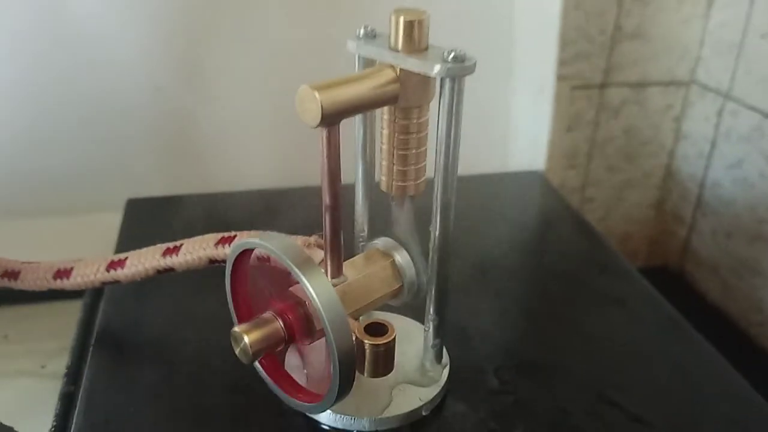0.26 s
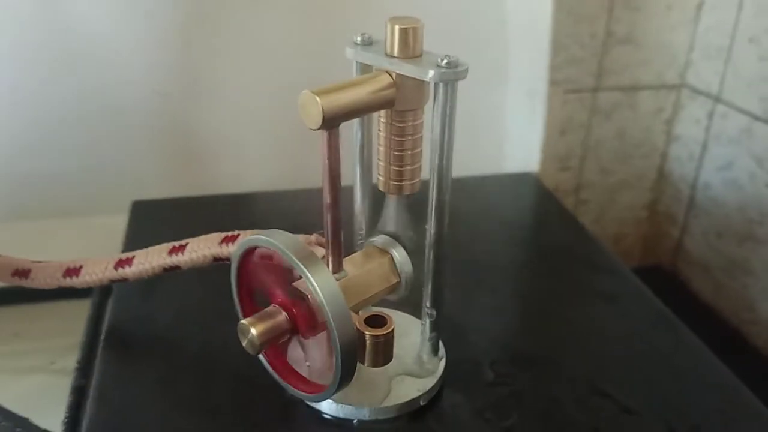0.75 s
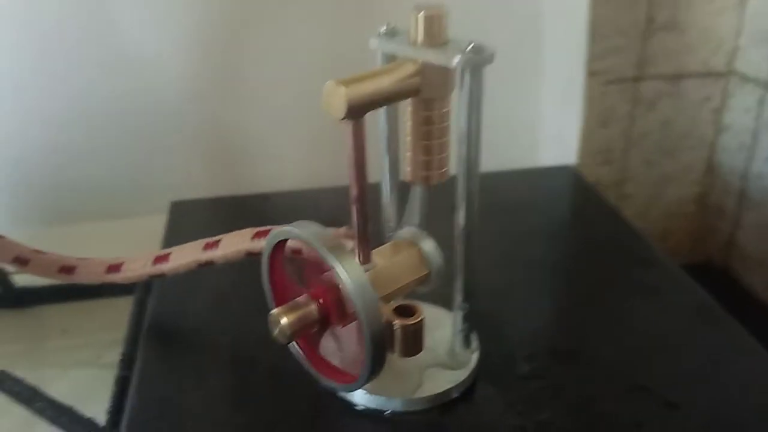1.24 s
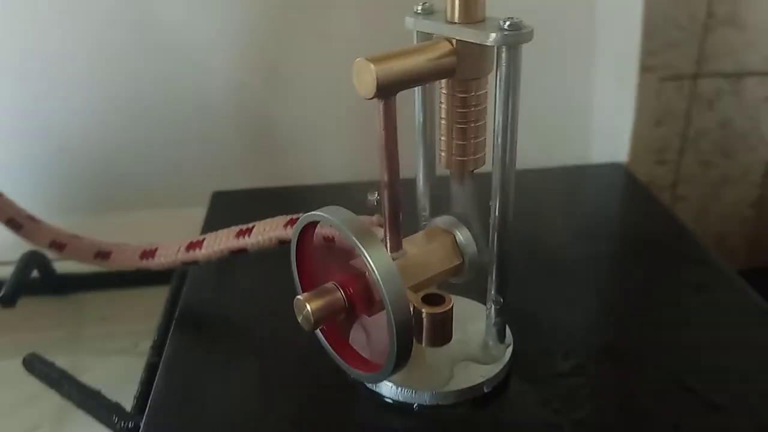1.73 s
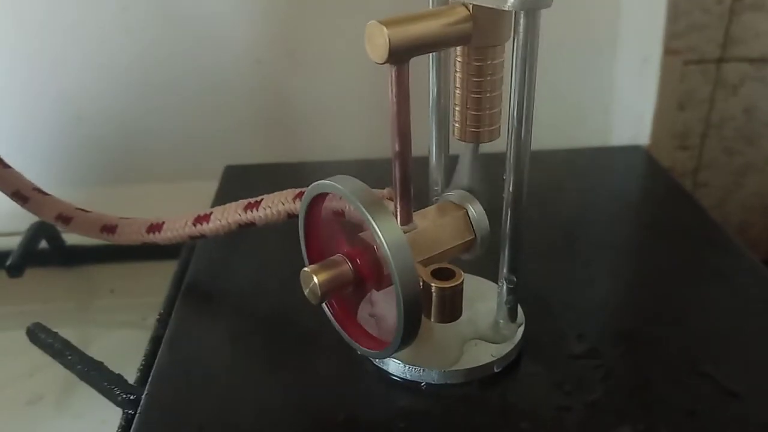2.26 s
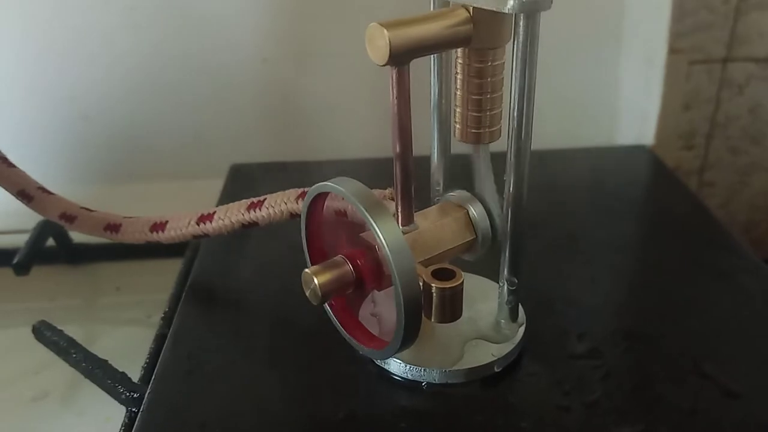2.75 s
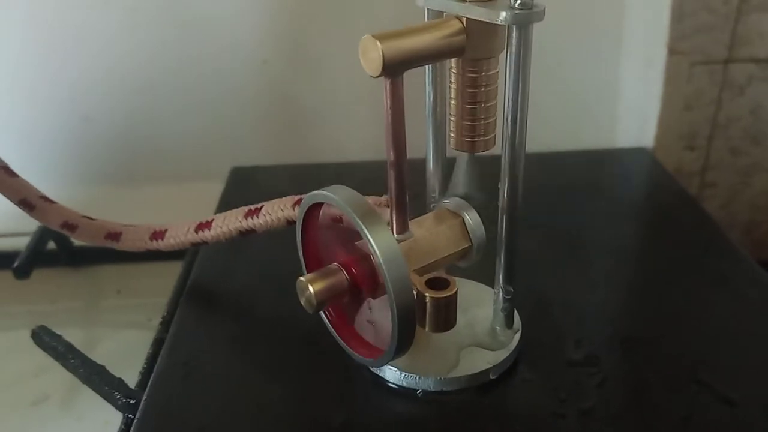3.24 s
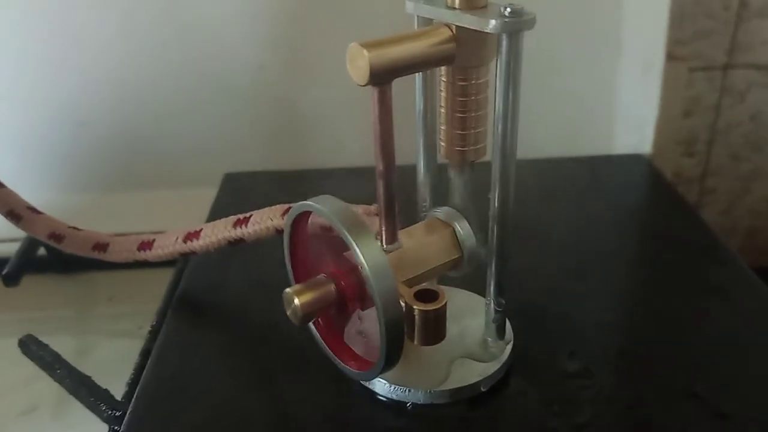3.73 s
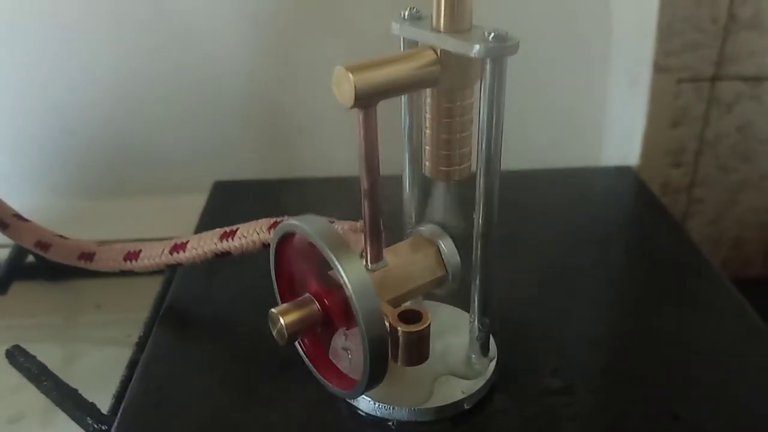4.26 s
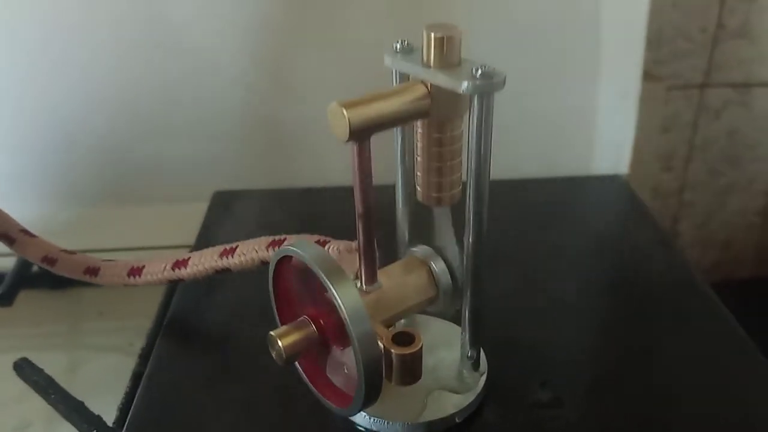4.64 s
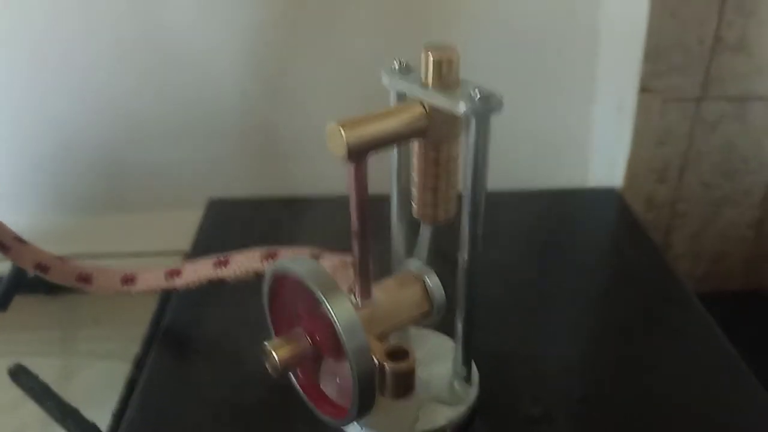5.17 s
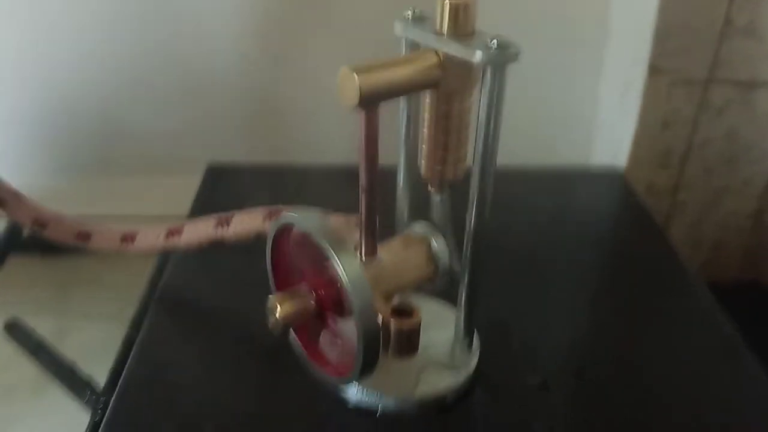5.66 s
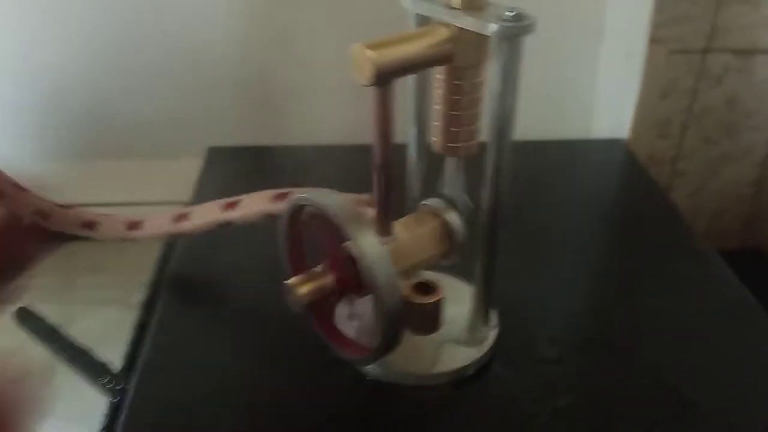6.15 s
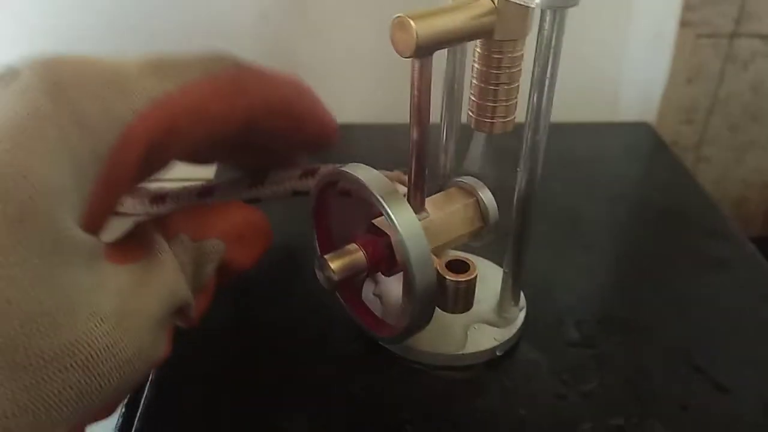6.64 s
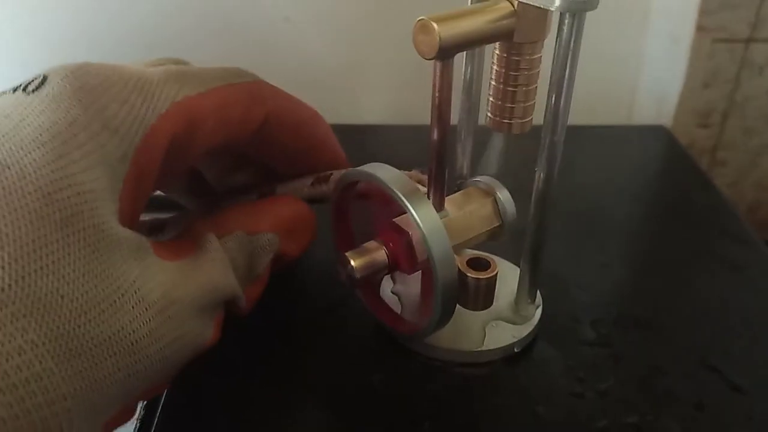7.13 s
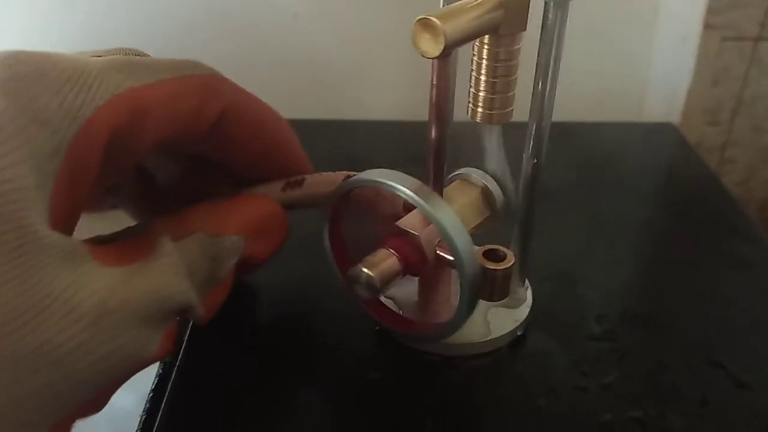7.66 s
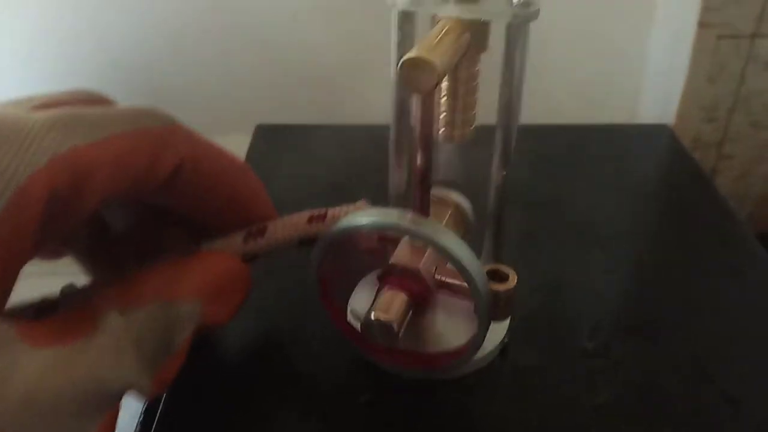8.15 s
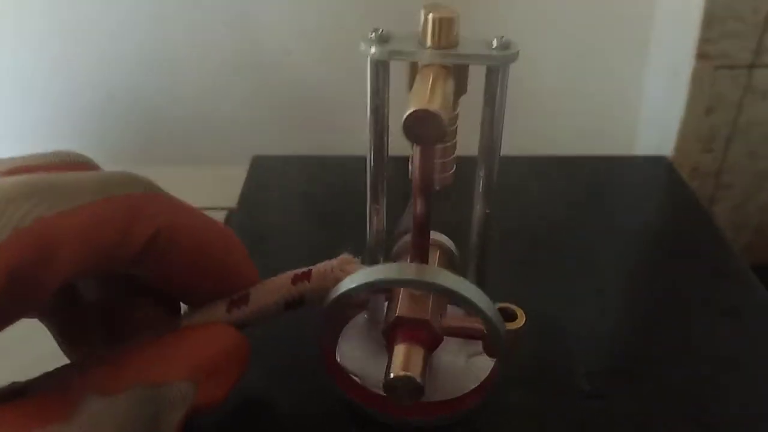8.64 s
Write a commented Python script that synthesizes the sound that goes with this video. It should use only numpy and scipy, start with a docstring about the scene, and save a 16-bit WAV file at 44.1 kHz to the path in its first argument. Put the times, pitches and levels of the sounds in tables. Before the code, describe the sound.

For about nine seconds a miniature steam engine runs on a tabletop, heard close up in stereo in a quiet room. It repeats about seven times a second, slowing very slightly late on: a dry, bright brass click with two minute rebounds, a rough bearing grind through the plate and frame, then an abrupt puff of exhaust. Beneath lies continuous wet, sputtering hiss with narrow whistling tints. Dull finger bumps and a short rub hit the left side during 0-0.5 s, with another bump at 1.5. From 4.6 to 5.8 the phone shifts with rubbing and thumps; the steam's tone changes and its right side comes forward, while clicks soften. Steam is stronger around 6-7.7, and a pulsing metallic hum peaks near 7.3. Clicks gain a lower clink towards the end. Condensate spits in small fizzes throughout, longer near 8.5-8.9. The engine never stops.

```python
"""A model steam engine with a rocking cylinder runs at six and a half to seven turns a second on a tabletop.
Wet steam leaks from its port face all the while and leaves in one puff of exhaust a turn: filtered, gated noise.
Once a turn a metal knock rebounds twice: decaying sines. The bearing rumbles: noise through resonances.
Condensate spits now and then: fizzing noise bursts. Fingers bump and rub a hand-held phone close by, which
shifts in the hand, most of all from about five seconds on. A quiet room lies behind."""
import sys
import numpy as np
from scipy import signal
from scipy.fft import rfft, irfft
from scipy.io import wavfile
from scipy.ndimage import uniform_filter1d, map_coordinates

SR = 44100
rng = np.random.default_rng(int(sys.argv[2]) if len(sys.argv) > 2 else 0)


def transcribe(signal):
    """Save signal, clipped to [-1, 1], as a 16-bit WAV file at the path in sys.argv[1]."""
    frames = np.atleast_2d(signal).T
    limited = np.clip(frames, -1, 1)
    pcm = np.round(limited * 32767).astype(np.int16)
    wavfile.write(sys.argv[1], SR, pcm)


N = 392490
TIME = np.arange(N) / SR

# Steam pressure, drives leak and puff. Each row: time in seconds, level in dB.
PRESSURE = [(0, 1.74), (3.7, 1.53), (4.8, 0.9), (6.1, 4.5), (7.7, 4), (8.3, 1.9), (8.9, 2.5)]
# Gaping of the port face. Each row: crank angle after the knock in turns, half width in turns,
# hiss in dB, fine spray in dB.
GAPES = [(0.178, 0.038, -3.5, 2), (0.307, 0.046, -4, -11), (0.493, 0.08, -2, -20),
         (0.622, 0.083, -1.5, -2.5)]
SEATED_HISS_DB, SEATED_SPRAY_DB = -4.5, 0
# Puffs that stand out. Each row: a time in seconds within the puff's turn, level change in dB.
ODD_PUFFS = [(.12, -1), (.56, -2.5), (.71, -4), (1.16, 2.5), (1.46, -1), (2.19, 1.5), (3.19, 4),
             (3.33, -1.5), (4.2, 2.5), (4.34, -0.5), (4.93, 0.5), (5.23, -2), (6.13, 2), (7.19, 0.5),
             (7.8, 2), (8.27, -2)]
PUFF_DB, PUFF_SCATTER_DB = -1, 1
PUFF_AT_TURN, PUFF_HOLD_TURNS, PUFF_FADE_TURNS, PUFF_ATTACK_TURNS = 0.787, 0.07, 0.055, 0.0044
# Steam spectrum at the two ports of the phone. Each row: frequency in Hz, left in dB, right in dB,
# left once shifted in dB, right once shifted in dB.
STEAM_SPECTRUM = [(533, 6.5, 2.5, -1, -16), (2277, 13.5, 5, 3, -10), (2563, 24.5, 13.5, 16.5, 0),
                  (3350, 25.5, 1, 10.5, -11), (3260, 24, 7, 22, -3), (4130, 25, 15.5, 13.5, 6.5),
                  (5120, 25, 14.5, 16, 1.5), (6550, 27, 21.5, 2.5, 7), (8240, 15, 9.5, 1.5, -7),
                  (9800, 14.5, 6, 11.5, -6), (10300, -5, 12.5, 15, -14), (10980, -7, 6, 12.5, -33),
                  (13530, 10, 17, 6.5, -40), (14900, 18.5, 20, -9, 0)]
# Shift of the phone in the hand. Each row: time in seconds, left port share 0-1, right port share 0-1.
PHONE_SHIFT = [(0, 0.66, 0.43), (4.9, 0.54, 0.34), (5.55, 0.86, 0.6), (5.85, 0.87, 0.9), (6.4, 0.91, 0.93),
               (7.8, 0.89, 0.92), (8.3, 0.78, 0.84), (8.9, 0.71, 0.89)]
STEAM_GAIN_DB = -37.5


def steam(turn):
    """Turbulent steam leaks as the cylinder rocks on its port face; the exhaust blows once a turn."""
    pressure_db = curves(PRESSURE, TIME)[0]
    leak = (leak_hiss(turn) + leak_spray(turn)) * undb(pressure_db)
    air = colour(leak + exhaust(turn, pressure_db), [30, 150, 500], [-35, -10, 0])
    air = air + passages(air)
    air = port_lag(mirrored(air))
    # the phone's body shades each port differently as it shifts
    hz, *ports_db = np.transpose(STEAM_SPECTRUM)
    heard = []
    for port, shift in enumerate(curves(PHONE_SHIFT, TIME)):
        before = colour(air[port], hz, ports_db[port])
        shifted = colour(air[port], hz, ports_db[port + 2])
        heard.append((1 - shift) * before + shift * shifted)
    return undb(STEAM_GAIN_DB) * np.array(heard)


def leak_hiss(turn):
    """Wet hiss, with droplets, swells whenever the port face gapes."""
    wet = jet(shared=0.45, grain_db=1.5, rate=330) + sputter()
    hiss = colour(wet, [7500, 10500, 14000], [0, -4.5, -14]) * undb(1.08 * walk(51))
    centres, widths, hiss_db, _ = np.transpose(GAPES)
    return hiss * swells(turn, centres, widths, hiss_db, SEATED_HISS_DB)


def leak_spray(turn):
    """Fine spray fills the treble, with swells of its own at the same gapes."""
    spray = colour(jet(shared=0.27, grain_db=2.0, rate=200), [7000, 9500, 13000], [-22, -3.5, 0])
    centres, widths, _, spray_db = np.transpose(GAPES)
    return spray * undb(walk(33)) * swells(turn, centres, widths, spray_db, SEATED_SPRAY_DB)


def exhaust(turn, pressure_db):
    """The exhaust port opens abruptly, blows for a moment and the cylinder empties."""
    # half a turn of offset keeps each puff within one draw
    puff_db = PUFF_DB + pressure_db + PUFF_SCATTER_DB * each_turn(turn + .5)
    puff_turn = np.floor(turn + .5)
    for s, db in ODD_PUFFS:
        puff_db = puff_db + db * (puff_turn == np.floor(np.interp(s, TIME, turn) + .5))
    gate = burst(turn, PUFF_AT_TURN, PUFF_HOLD_TURNS, PUFF_FADE_TURNS, attack=PUFF_ATTACK_TURNS)
    blast = jet(shared=0.66, grain_db=0.5, rate=1400) * gate * undb(puff_db)
    puff = colour(blast, [2500, 4950, 11600, 13100], [1, 2, 6, 7.5])
    return signal.sosfilt(signal.butter(3, 1500, "high", fs=SR, output="sos"), puff)


SPUTTER_PER_S, SPUTTER_HZ, SPUTTER_WIDTH_HZ = 34, (2600, 6000), 260
SPUTTER_SHORTEST_S = .006  # lengths run up to twice this
SPUTTER_DB, SPUTTER_SCATTER_DB = -11.5, 2.5  # against the hiss, before the fade


def sputter():
    """Droplets torn off the port face, each a short fizz on its own pitch."""
    t = np.arange(SR // 25) / SR
    out = np.zeros(N + len(t))
    for when, pitch, length in rng.random((int(SPUTTER_PER_S * N / SR), 3)):
        mode = [(np.interp(pitch, [0, 1], SPUTTER_HZ), SPUTTER_WIDTH_HZ, 0)]
        fizz = resonate(resonate(rng.standard_normal(len(t)), mode), mode)
        fizz = level(fizz, SPUTTER_DB + SPUTTER_SCATTER_DB * rng.standard_normal())
        start = int(when * N)
        out[start:start + len(t)] += fizz * np.exp(-(t / (SPUTTER_SHORTEST_S * (1 + length))) ** 2)
    return out[:N]


# Rings of the drilled passages. Each row: frequency in Hz, width in Hz, level in dB,
# strongest at in seconds, half span in seconds.
PASSAGES = [(2456, 35, 0, 1, 16), (2810, 64, 0, 0.62, 2.6), (3790, 88, -2, 1.1, 0.69),
            (4340, 87, -2, 0.64, .7), (5200, 90, 0, 0.9, 0.72), (5450, 110, -3, 2.6, 2),
            (4640, 70, -2, 4.2, 1.3), (2890, 89, 1.5, 5.97, 0.5), (5550, 130, -5, 7.3, 1.5),
            (2950, 260, 0, 8.4, 1.1)]


def passages(air):
    """The hiss rings the drilled passages; films of water make each pitch swell and fade by itself."""
    out = 0
    for *mode, s, span in PASSAGES:
        presence = np.exp(-((TIME - s) / span) ** 2) * undb(2 * walk(30))
        out = out + resonate(air, [mode]) * presence
    return out


# Echoes off tabletop and wall. Each row: mean delay at left port in seconds,
# mean delay at right port in seconds, level in dB.
MIRRORS = [(.00132, .00145, -18), (.0034, .0029, -16), (.0071, .0078, -14)]
SWAY_SHARE, SWAY_PER_S = .012, .8


def mirrored(x):
    """Near surfaces comb the sound, and the comb wanders as the hand's sway stretches the paths."""
    stretch = 1 + SWAY_SHARE * walk(SWAY_PER_S)
    out = x
    for *delays, db in MIRRORS:
        echo = [map_coordinates(port, [(TIME - delay * stretch) * SR], order=2)
                for port, delay in zip(x, delays)]
        out = out + undb(db) * np.array(echo)
    return out


# Lag of the right port. Each row: frequency in Hz, phase in radians.
PORT_LAG = [(1500, 0.5), (2600, 0.85), (3600, 2.5), (4700, 0.2), (6000, 1.2), (8600, 0.85), (9600, 3.5),
            (11000, 1.5), (13000, 4), (15000, 6)]


def port_lag(x):
    """The way round the phone's body delays the phase at the right port."""
    lag = curves(PORT_LAG, np.arange(N // 2 + 1) * SR / N)[0]
    return np.array([x[0], irfft(rfft(x[1]) * np.exp(-1j * lag), N)])


# Brass cylinder and crank: dry crack and faint ring. Each row: frequency in Hz, t60 in seconds, level in dB.
BRASS = [(1945, 0.14, -30), (5750, 0.028, -17), (6080, 0.008, 0), (6222, 0.032, -14), (6545, 0.036, -17),
         (6900, 0.009, -2.5), (7180, 0.022, -17), (13400, 0.014, -12), (15000, 0.005, -10)]
# Lower ring, comes forward as the engine is turned by its hose. Each row: time in seconds, level in dB.
CLINK_LEVEL = [(0, -19), (7.5, -8.5), (8.9, 0)]
CLINK_HZ, CLINK_T60_S = 4360, .022
# Rebounds after the blow. Each row: delay in first-rebound gaps, level in dB.
REBOUNDS = [(1, -3.5), (1.8, -12)]
REBOUND_S, REBOUND_SCATTER_S, REBOUND_MIN_S = .0027, 0.0002, .001
# Radiation of the small parts. Each row: frequency in Hz, level in dB.
KNOCK_COLOUR = [(2000, -4), (4300, -3), (5000, -7), (5700, 0), (7300, 0), (8000, -8), (12000, -8),
                (13300, -1)]
KNOCK_DB, KNOCK_SCATTER_DB, SHIFTED_KNOCK_DB = -31.2, 0.7, -5
KNOCK_PAN_DB, SHIFTED_PAN_DB = 15, 12  # left minus right; change at full shift
CONTACT_S = .00028
KNOCK_DETUNE = .12  # share of each mode's width


def knock(turn, scatter_db):
    """Play in the crank is taken up once a turn: a hard blow and two rebounds ring the brass."""
    t = np.arange(SR // 6) / SR
    contact = 1 - np.exp(-(t / CONTACT_S) ** 2)
    hz, t60, modes_db = np.transpose(BRASS)[:, :, None]
    width_hz = np.log(1000) / (np.pi * t60)
    clink = undb(-60 * t / CLINK_T60_S) * np.sin(2 * np.pi * CLINK_HZ * t)
    out = np.zeros(N + len(t))
    times = passes(turn, 0)
    for s, chance in zip(times, rng.standard_normal((len(times), 3 + len(BRASS)))):
        gap_chance, rebound_chance, level_chance = chance[:3]
        # no two blows land on quite the same spot
        pitch = hz + KNOCK_DETUNE * rng.standard_normal(hz.shape) * width_hz
        decay = undb(modes_db + scatter_db * chance[3:, None] - 60 * t / t60)
        ring = np.sum(decay * np.sin(2 * np.pi * pitch * t), axis=0)
        strike = contact * (ring + undb(curves(CLINK_LEVEL, s)[0]) * clink)
        sound = strike.copy()
        for gaps, rebound_db in REBOUNDS:
            lag_s = gaps * (REBOUND_S + REBOUND_SCATTER_S * gap_chance)
            lag = int(max(lag_s, REBOUND_MIN_S) * SR)
            sound[lag:] += undb(rebound_db + scatter_db * rebound_chance) * strike[:-lag]
        start = int(s * SR)
        out[start:start + len(t)] += level(sound, KNOCK_SCATTER_DB * level_chance)
    shift = curves(PHONE_SHIFT, TIME)[1]
    heard = corner(colour(out[:N], *np.transpose(KNOCK_COLOUR)), wet_db=-10, t60=.075)
    return level(heard * undb(SHIFTED_KNOCK_DB * shift), KNOCK_DB) * pan(KNOCK_PAN_DB + SHIFTED_PAN_DB * shift)


# Resonances of tabletop, base plate and frame. Each row: frequency in Hz, width in Hz, level in dB.
TABLE = [(109.5, 10.6, -0.5), (165.2, 13.6, -5.5), (273.5, 17.5, -7), (315, 6.7, -4), (379.3, 17, -3.5)]
PLATE = [(492, 18, -16), (554, 32, -9), (699, 15.6, 5)]
FRAME = [(819.4, 17, 3), (923, 40, 4.5), (1057, 255, -5.5), (1182, 56, 5.5), (1274, 40, -1),
         (1594, 43, -3.5), (1930, 18, 0.5), (2220, 25, -5.5)]
# Shaft bearing down. Each row: crank angle in turns, half width in turns, table in dB, base plate in dB,
# frame in dB.
RUBS = [(0.06, 0.066, -7, 16.5, 15.5), (0.163, 0.075, 2, 14, 13.5), (0.307, 0.029, 5, 14.5, 16),
        (0.518, 0.08, -3.5, 7.5, 14), (.71, 0.042, -4, -6, 14.5)]
FREE_TABLE_DB, FREE_PLATE_DB, FREE_FRAME_DB = -11, -7, 3
# Shaft unloaded while the cylinder exhausts: crank angle in turns, half width in turns, level in dB.
UNLOADED = (0.746, 0.075, -5)
TABLE_GAP_DB, TABLE_GAP_AT_TURN, TABLE_GAP_HALF_TURNS = -6, 0.92, 0.062
# Ring of the base plate. Each row: time in seconds, level in dB.
PLATE_LEVEL = [(0, 3.5), (1.1, -0.5), (1.9, -2), (4.4, -1), (5.3, 2.5), (6.7, 0.5), (7.25, -5.5), (8.0, 0),
               (8.9, -1)]
SHIFTED_FRAME_DB = -2.5


def bearing(turn):
    """The shaft grinds under a load that varies round the turn and shakes table, plate and frame."""
    taps = piston_taps(turn)
    centres, widths, table_db, plate_db, frame_db = np.transpose(RUBS)
    centre, width, unloaded_db = UNLOADED
    load = undb(unloaded_db * around(turn, centre, width))

    def grind(noise, peaks_db, free_db):
        """Rubbing noise swells wherever the shaft bears down."""
        return noise * load * swells(turn, centres, widths, peaks_db, free_db)

    table = grind(jet(shared=0.93, grain_db=2.5, rate=250), table_db, FREE_TABLE_DB)
    plate = grind(jet(shared=0.78, grain_db=0.0, rate=270), plate_db, FREE_PLATE_DB)
    frame = grind(jet(shared=0.61, grain_db=1.5, rate=96), frame_db, FREE_FRAME_DB)
    table = resonate(table, TABLE) * undb(TABLE_GAP_DB * around(turn, TABLE_GAP_AT_TURN, TABLE_GAP_HALF_TURNS))
    table = level(colour(table, [30, 90, 450, 900], [10, 3.2, 1.4, 5.8]), -48.0)
    plate = level(colour(resonate(plate + taps, PLATE), [100, 400], [-15, 0]), -44.5)
    plate = (plate + plate_song(turn, load)) * undb(curves(PLATE_LEVEL, TIME)[0])
    frame = level(colour(resonate(frame + taps, FRAME), [100, 600, 1250, 1450], [-20, 1.5, 2, -0.5]), -39.5)
    return table + plate + frame * undb(SHIFTED_FRAME_DB * curves(PHONE_SHIFT, TIME)[1])


# Taps of the reversing piston. Each row: crank angle in turns, level in dB.
TAPS = [(.948, 38), (.962, 29)]
TAP_SCATTER_DB = 1.1


def piston_taps(turn):
    """The piston taps twice a turn as it reverses: single impulses."""
    taps = 0
    for share, db in TAPS:
        times = passes(turn, share)
        taps = taps + clicks(times, undb(db + TAP_SCATTER_DB * rng.standard_normal(len(times))))
    return taps


# Strength of the singing. Each row: time in seconds, level in dB.
SING_LEVEL = [(0, -9.5), (1, 8), (2, -2), (4.5, -44), (5.7, -16), (6.9, 5), (7.28, 21), (7.5, 12),
              (7.9, 7.5), (8.9, -12)]
SING_AT_TURN, SING_HOLD_TURNS, SING_FADE_TURNS, SING_ATTACK_TURNS = .94, 0.13, 0.52, 0.052
SING_DB, SING_WANDER_HZ = -50.5, 3


def plate_song(turn, load):
    """The piston's tap starts, and rubbing under load keeps up, a hum on the plate's main mode."""
    hz = PLATE[-1][0] + SING_WANDER_HZ * walk(17.2)
    hum = np.sin(2 * np.pi * np.cumsum(hz) / SR) * undb(curves(SING_LEVEL, TIME)[0])
    gate = burst(turn, SING_AT_TURN, SING_HOLD_TURNS, SING_FADE_TURNS, attack=SING_ATTACK_TURNS)
    return level(hum * load * gate, SING_DB)


# Condensate spits. Each row: start in seconds, frequency in Hz, width in Hz, length in seconds, relative dB.
SPITS = [(0.123, 2520, 1100, 0.012, -24.5), (0.274, 5270, 400, 0.012, -28), (0.37, 3770, 1600, 0.019, -34),
         (0.718, 5640, 1200, 0.0066, -25), (0.866, 5300, 700, 0.013, -24.5),
         (1.901, 2950, 1000, 0.0075, -28.5), (2.193, 5500, 485, 0.016, -29),
         (2.766, 3330, 700, 0.0055, -27), (2.908, 4560, 900, 0.0063, -27), (3.879, 2970, 696, 0.02, -32),
         (3.893, 4780, 400, 0.011, -25), (3.91, 3440, 900, 0.025, -32), (3.97, 3000, 300, 0.013, -32.5),
         (4.038, 3480, 900, 0.022, -30), (4.053, 2700, 900, 0.012, -27.5), (4.202, 5600, 500, 0.014, -28),
         (4.46, 4800, 600, 0.012, -27), (4.489, 5440, 400, 0.009, -27), (5.344, 4480, 900, 0.0041, -27),
         (5.68, 2840, 700, 0.0097, -28), (5.861, 4270, 297, 0.0086, -23.5),
         (6.137, 2700, 700, 0.0082, -24.5), (6.695, 3500, 500, 0.015, -29),
         (8.126, 2950, 1110, 0.0032, -25), (8.412, 2850, 1600, 0.0019, -22),
         (8.514, 3140, 1600, 0.067, -32), (8.58, 3200, 1600, 0.0023, -21), (8.729, 2800, 1000, 0.0041, -22),
         (8.789, 3250, 1620, 0.18, -33)]
SPITS_GAIN_DB = 6.0


def spits():
    """Drops of condensate are blown through the port with a short fizz."""
    out = np.zeros(N)
    t = np.arange(SR // 8) / SR
    for s, hz, width, length, db in SPITS:
        mode = [(hz, width, 0)]
        fizz = level(resonate(resonate(rng.standard_normal(len(t)), mode), mode), db + SPITS_GAIN_DB)
        fizz = fizz * np.exp(-(t / length) ** 2)
        start = int(s * SR)
        out[start:start + len(t)] += fizz[:N - start]
    out = colour(out, [1800, 2450], [-12, 0])
    return corner(out, wet_db=-4, t60=.04) * pan(12.)


# Bumps on the phone. Each row: start in seconds, peak in dB, contact time constant in seconds.
BUMPS = [(0.076, -10.5, 0.00049), (0.1526, -9.5, 0.00038), (0.209, -10.5, 0.00022), (0.212, -17, 0.0012),
         (0.228, -14, 0.0011), (0.246, -17.5, 0.0004), (0.283, -24, 0.00029), (0.327, -18, 0.00034),
         (0.348, -17, .0005), (0.374, -25, 0.00071), (0.456, -23.5, 0.00029), (1.554, -13, 0.00083),
         (4.6, -20, 0.00088), (4.865, -16.5, 0.0014), (4.922, -23.5, 0.00065), (5.028, -25, 0.0014),
         (5.697, -20, 0.00079), (5.747, -12, 0.00038)]
CASE_HZ = 92  # high-pass corner
CASE_RING = (280, 200, -3)  # Hz, width Hz, dB


def bumps(roughness):
    """A finger lands with a short, gritty push; the phone's case rings and swings back."""
    out = np.zeros(N)
    t = np.arange(SR // 10) / SR
    case = signal.butter(6, CASE_HZ, "high", fs=SR, output="sos")
    for s, db, contact in BUMPS:
        grit = level(uniform_filter1d(rng.standard_normal(len(t)), size=14))
        push = (t / contact) ** 2 * np.exp(-t / contact) * (1 + roughness * grit)
        swing = signal.sosfilt(case, push + resonate(push, [CASE_RING]))
        start = int(s * SR)
        out[start:start + len(t)] += undb(db) * swing / np.max(np.abs(swing))
    return out


# Fingers sliding on the case. Each row: start in seconds, peak rms in dB, rise in seconds, fade in seconds.
SLIDES = [(.21, -33, 0.019, 0.09), (4.87, -39, 0.025, 0.15), (5.25, -37, 0.2, 0.33)]


def slides():
    """Skin rubs along the case: dull, flickering noise."""
    skin = grainy(grain_db=4, rate=200)
    rub = level(colour(skin, [30, 100, 350, 700, 2000], [-6, 12.0, 9.0, -9.0, -39]))
    sliding = 0
    for s, db, rise, fade in SLIDES:
        fall = np.exp(-np.maximum(TIME - s - rise, 0) / fade)
        sliding = sliding + undb(db) * np.clip((TIME - s) / rise, 0, 1) * fall
    return rub * sliding


def fingers(roughness=0.14):
    """Bumps and rubbing reach mainly the left port through the case."""
    return (bumps(roughness) + slides()) * pan(30.0) / np.sqrt(2)


# Room spectrum. Each row: frequency in Hz, level in dB.
ROOM = [(20, -16), (45, -11), (75, -22), (130, 20), (300, 5), (1000, -5), (4000, -6)]


def room():
    """Steady low noise of the quiet room."""
    return level(colour(rng.standard_normal(N), *np.transpose(ROOM)), -58.5)


def undb(db):
    """Decibels to gain."""
    return 10 ** (np.asarray(db) / 20)


def level(x, db=0):
    """Scale to an rms level."""
    return x * undb(db) / np.sqrt(np.mean(x ** 2))


def curves(table, at):
    """Each column of a table, joined by straight lines."""
    x, *columns = np.transpose(table)
    return [np.interp(at, x, c) for c in columns]


def pan(db):
    """Left and right gains for a level difference, at equal power."""
    gains = undb(np.array([db, -db]).reshape(2, -1) / 2)
    return gains / np.sqrt(np.mean(gains ** 2, axis=0))


def colour(x, hz, db):
    """Filter by a spectrum of (Hz, dB) points."""
    f = np.arange(N // 2 + 1) * SR / N
    return irfft(rfft(x) * undb(np.interp(np.log(f + 1), np.log(hz), db)), N)


def resonate(x, modes):
    """Band-pass resonances side by side, in alternating polarity."""
    out = 0
    for k, (hz, width, db) in enumerate(modes):
        out = out + (-1) ** k * undb(db) * signal.lfilter(*signal.iirpeak(hz, hz / width, SR), x)
    return out


def walk(rate):
    """Smooth chance with an rms of 1."""
    k = max(int(SR / rate), 1)
    return level(uniform_filter1d(uniform_filter1d(rng.standard_normal(N), k), k))


def grainy(grain_db, rate):
    """Noise whose level flickers from grain to grain."""
    return level(rng.standard_normal(N) * undb(grain_db * walk(rate)))


def jet(shared, grain_db, rate):
    """Grainy noise at two ports: a share arrives directly, the rest is scattered by the walls and unlike."""
    noise = np.sqrt(shared) * rng.standard_normal(N) + np.sqrt(1 - shared) * rng.standard_normal((2, N))
    return level(noise * undb(grain_db * walk(rate)))


def clicks(times, sizes):
    """Single impulses."""
    index = np.round(times * SR).astype(int)
    inside = (index >= 0) & (index < N)
    return np.bincount(index[inside], sizes[inside], N)


def corner(x, wet_db, t60):
    """Tabletop and walls scatter a different short tail to each port."""
    t = np.arange(SR // 4) / SR
    tail = rng.standard_normal((2, len(t))) * np.exp(-np.log(1000) * t / t60) * (t > .0004)
    tail *= undb(wet_db) / np.sqrt(np.sum(tail ** 2, axis=1, keepdims=True))
    tail[:, 0] = 1  # direct sound
    return signal.fftconvolve(x[None], tail, axes=1)[:, :N] / np.sqrt(1 + undb(2 * wet_db))


def swells(turn, centres, widths, peaks_db, rest_db):
    """Smooth swells that come round with the crank, added in power to a resting level."""
    power = undb(rest_db) ** 2
    for centre, width, db in zip(centres, widths, peaks_db):
        power = power + undb(db) ** 2 * around(turn, centre, width)
    return np.sqrt(power)


def passes(turn, share):
    """The times at which the crank passes an angle."""
    return np.interp(np.arange(share, turn[-1]), turn, TIME)


def each_turn(turn):
    """Chance that is drawn anew for every turn."""
    return rng.standard_normal(int(turn[-1]) + 2)[turn.astype(int)]


def burst(turn, opens, holds, fade, attack):
    """Once a turn: a quick rise, a hold and a fade, all in turns."""
    age = (turn - opens) % 1
    return np.clip(age / attack, 0, 1) * np.exp(-np.maximum(age - holds, 0) / fade)


def around(turn, centre, width):
    """A bell-shaped window about one angle of the crank."""
    return np.exp(-(((turn - centre + .5) % 1 - .5) / width) ** 2)


# Flywheel speed. Each row: time in seconds, turns per second.
SPEED = [(0.0, 6.687), (0.85, 6.654), (1.8, 6.907), (2.55, 6.902), (2.7, 6.986), (3.35, 7.051),
         (4.15, 6.828), (4.4, 6.908), (4.8, 6.729), (5.6, 6.719), (6.15, 6.572), (6.6, 6.629), (7.0, 6.544),
         (7.45, 6.597), (7.8, 6.406), (8.9, 6.486)]
START_TURN = .0188  # after a knock
# Brief dip of the steam: time in seconds, half length in seconds, level in dB.
DIP = (0.22, 0.027, -5)


def scene():
    """Everything on the engine follows the angle of the crank."""
    turn = START_TURN + np.cumsum(curves(SPEED, TIME)[0]) / SR
    s, length, db = DIP
    dip = undb(db * np.exp(-((TIME - s) / length) ** 2))
    engine = steam(turn) * dip + knock(turn, scatter_db=2.0) + bearing(turn) + spits()
    return engine + fingers() + room()


TOP_HZ = 15550


def record(dry):
    """The phone cuts the top with a steep low-pass."""
    return signal.sosfilt(signal.ellip(10, .2, 80, TOP_HZ, fs=SR, output="sos"), dry)


dry = scene()
out = record(dry)
transcribe(out)
```